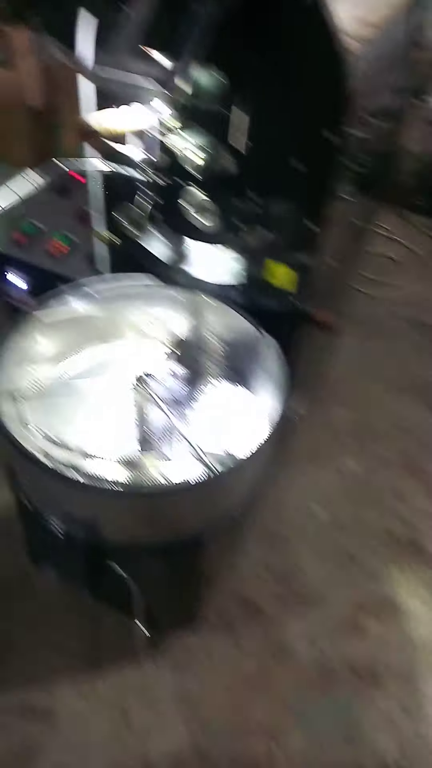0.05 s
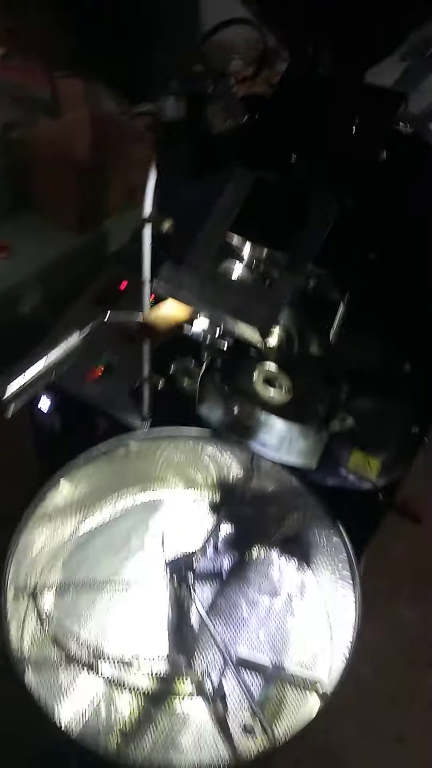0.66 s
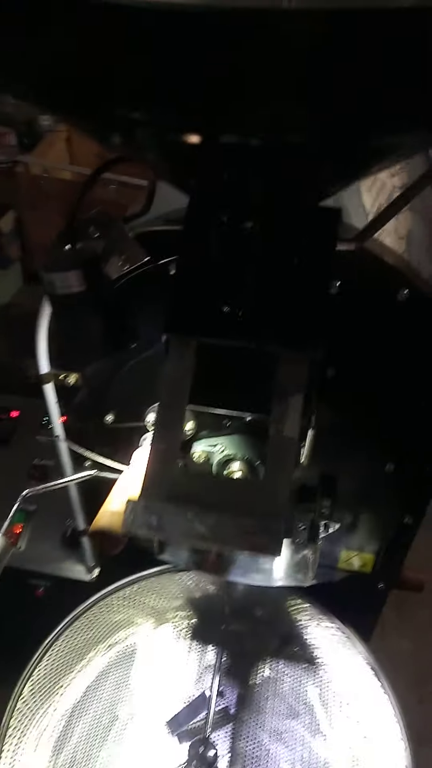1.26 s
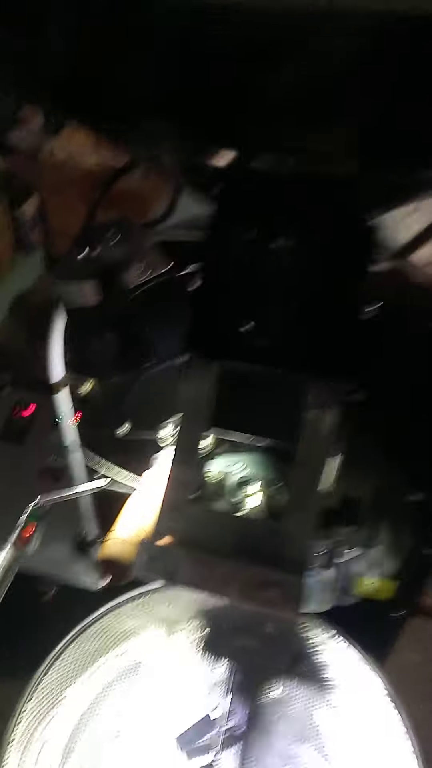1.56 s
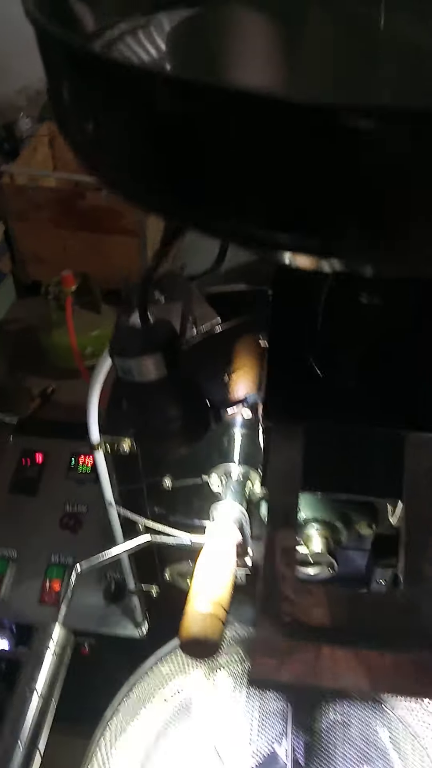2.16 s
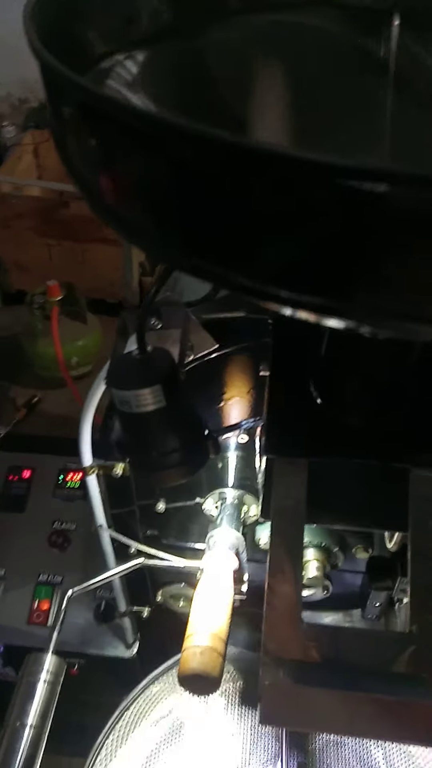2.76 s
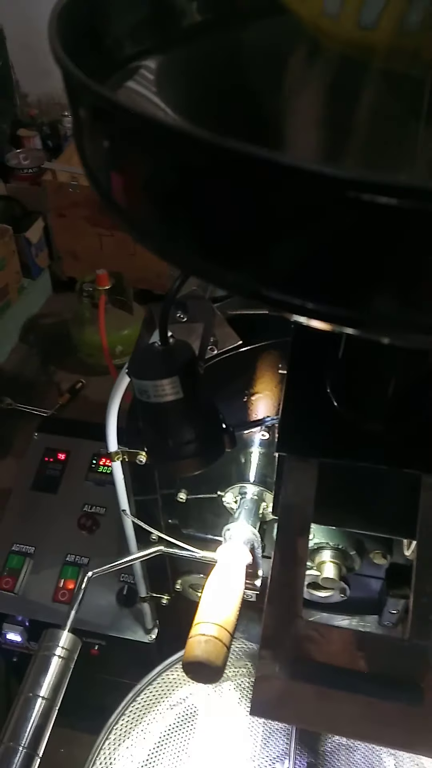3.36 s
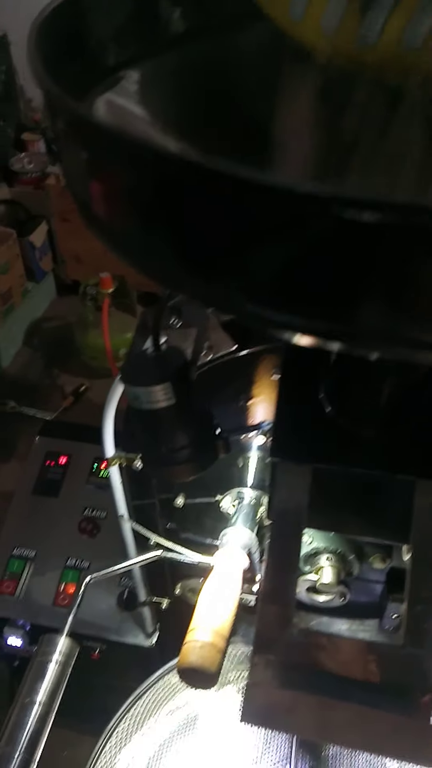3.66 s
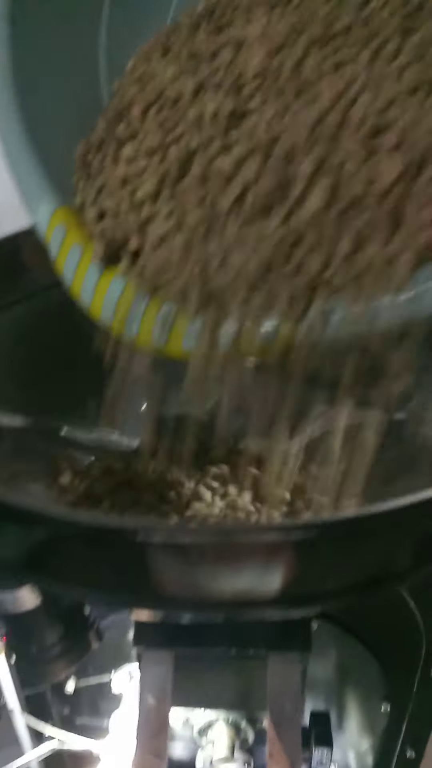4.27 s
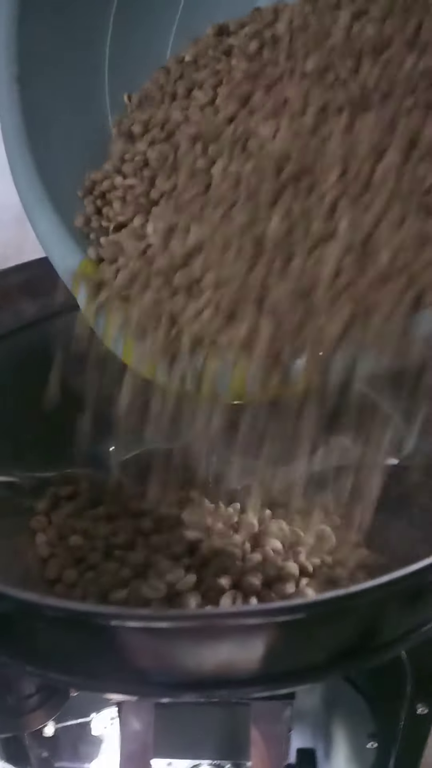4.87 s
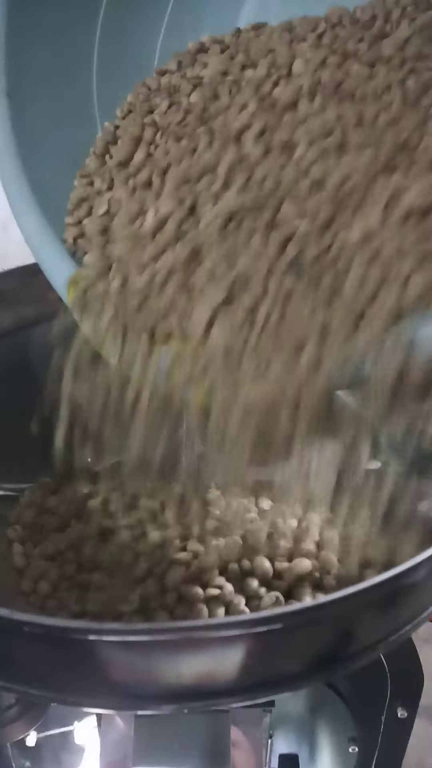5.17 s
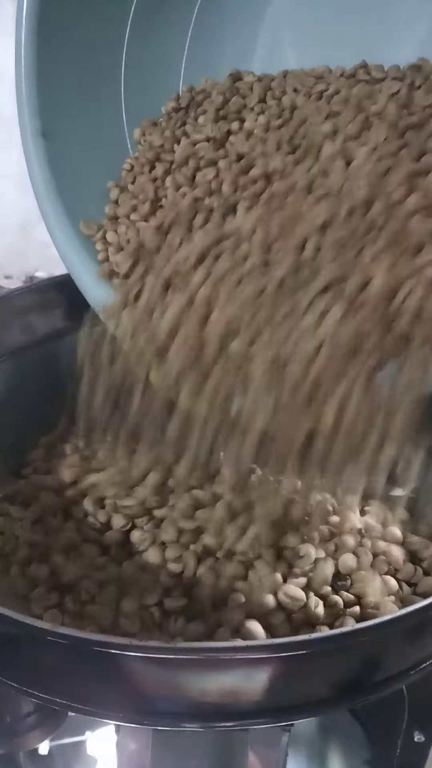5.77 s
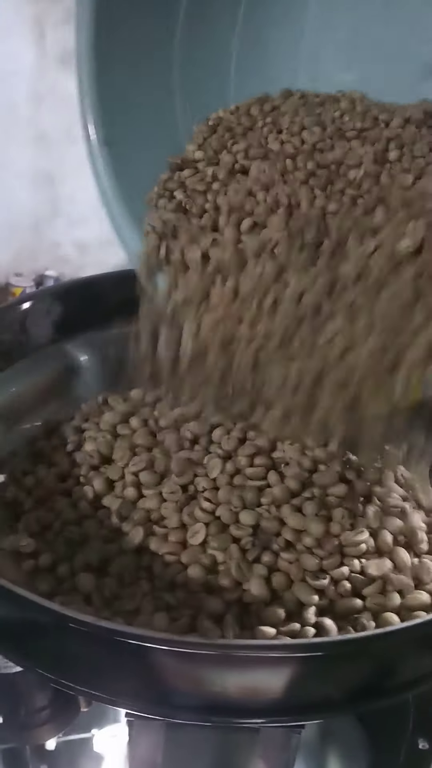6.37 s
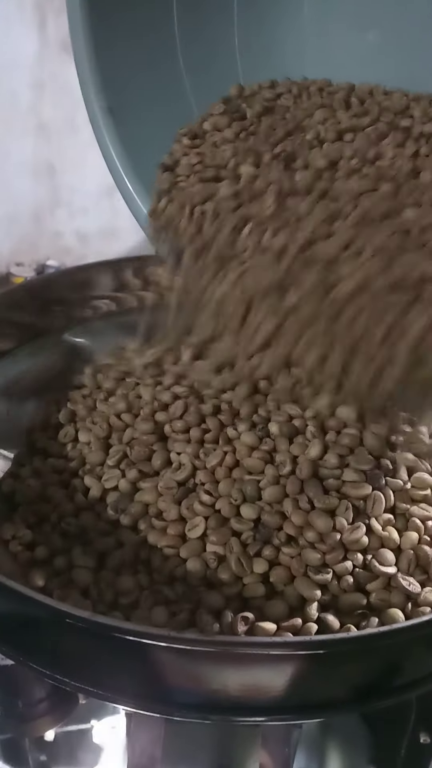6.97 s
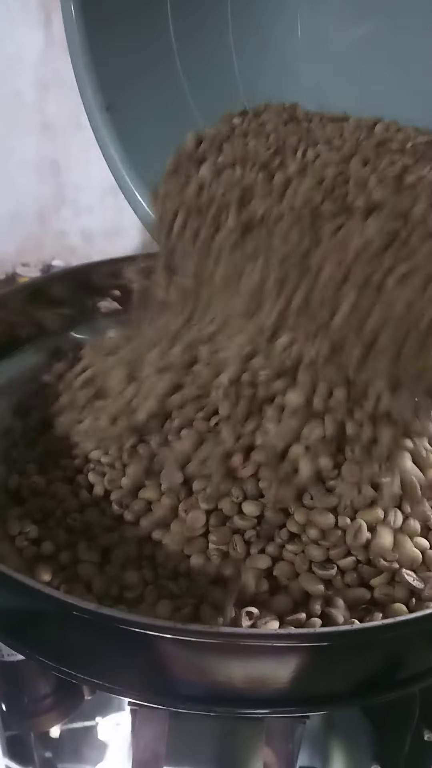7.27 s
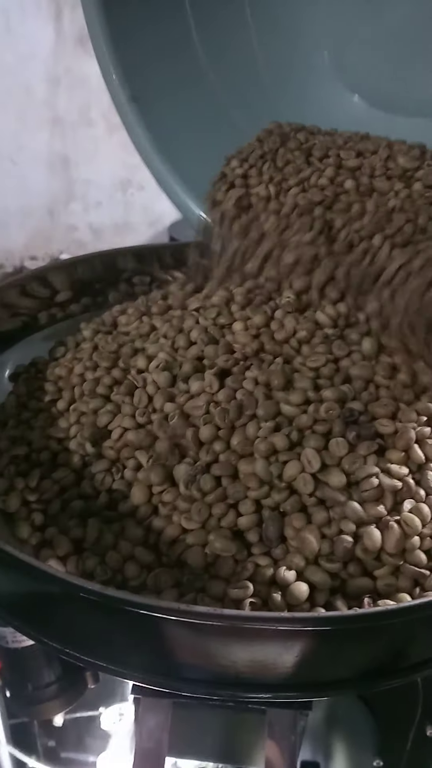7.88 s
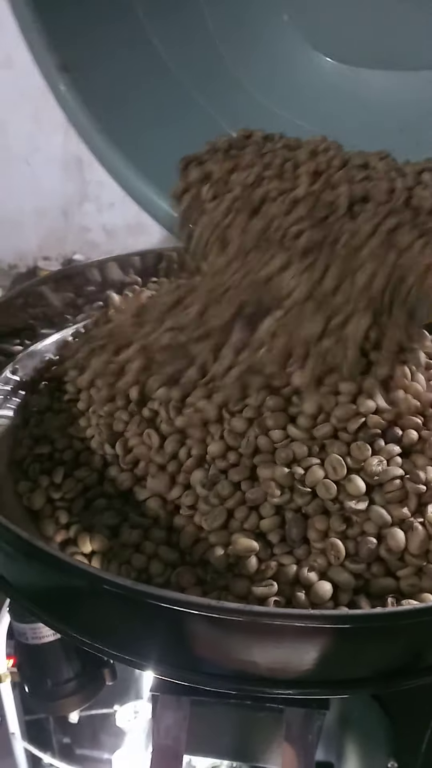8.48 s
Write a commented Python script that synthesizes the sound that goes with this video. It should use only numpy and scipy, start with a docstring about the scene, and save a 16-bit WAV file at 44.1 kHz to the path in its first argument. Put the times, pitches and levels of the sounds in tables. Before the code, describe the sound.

A coffee roaster's motor hums and its fan rushes throughout. Dry beans click and slide in a plastic basin, then pour into a steel pan with a dense, bright, ringing rattle and a few dull bumps. As the heap grows, the ringing dies away and single clinks stand out, leaving a softer rustle of beans landing on beans. The sound is close, with the faint echo of a small workshop.

```python
"""Coffee beans poured into a roaster

Dry beans crack and slide in a plastic basin, then hail into a steel pan, which rings.
A heap grows and covers the steel: the ring dies, single clinks stand out, and a softer rustle
of bean on bean is left. Now and then the heap spills against the wall. The roaster's motor and
fan run throughout; an automatic volume control turns everything down during the loudest rattle."""
import sys
import numpy as np
from scipy import signal
from scipy.fft import rfft, irfft
from scipy.io import wavfile
from scipy.ndimage import uniform_filter1d

SR = 44100
rng = np.random.default_rng(int(sys.argv[2]) if len(sys.argv) > 2 else 0)


def dump(signal):
    """Clip the signal to [-1, 1] and save it as 16-bit WAV at the path in sys.argv[1]."""
    limited = np.clip(np.atleast_2d(signal).T, -1, 1)
    pcm = np.round(limited * 32767).astype(np.int16)
    wavfile.write(sys.argv[1], SR, pcm)


N = 385434
T = np.arange(N) / SR

POUR_S, POUR_FULL_S, COVER_S = 2.864, 3.18, 3.86  # the pour starts, is full, starts to cover the steel
THIN_S, DEEP_S = 4.03, 5.47  # the heap is a thin layer, then deep enough to muffle the pan

# the first beans to land in the empty pan: (time [s], level [dB], time for the bounces to die [s])
FIRST_BEANS = [(2.697, -21, 1), (2.8186, -20, 0.56), (2.863, -19, 0.23)]
# short notes of the spots where beans strike the steel: (pitch [Hz])
STEEL_NOTES = [2870, 4380, 4820, 4850, 5350, 6420, 6560, 10100]
# clear notes of beans that strike squarely: (pitch [Hz])
SQUARE_HIT_NOTES = [4850, 4900, 4950, 5000, 4400, 5400, 5850, 6550]
# tone of a bean on steel: (frequency [Hz], level [dB])
STEEL_TONE = [(40, -59), (150, -23), (640, -43), (850, -15.5), (1400, -15), (1900, -9), (2900, -7.5),
              (3500, -3.5), (4300, -3), (5000, -2), (6500, 1.5), (8100, -8.5), (10000, -6), (12500, -15),
              (16000, -22.5)]
# the notes at which the whole pan rings: (pitch [Hz], level [dB])
PAN_RING = [(775, -55), (845, -49.5), (925, -54), (964, -49.5), (1045, -45), (1179, -46.5), (1300, -56),
            (1630, -50), (1700, -54), (1809, -50), (1897, -48), (1935, -47), (2067, -48), (2250, -52),
            (2338, -52), (2525, -49), (2649, -50), (2873, -45), (3041, -49), (3257, -51), (3410, -51),
            (4124, -47), (4323, -50), (4465, -46), (4813, -43.5), (4852, -45.5), (4990, -47), (5249, -47),
            (5475, -48), (5737, -47), (6465, -47), (6790, -50), (7250, -49), (7870, -53), (8801, -50)]

def pan(ring_db=23, muffle_db=-28, cover_db_per_s=20.5, thinning_s=0.14):
    """Beans hail on steel: a bright clatter, and a ring that lasts until the heap muffles it."""
    covered_s = np.maximum(T - COVER_S, 0)
    bare = np.exp(-covered_s / thinning_s)  # share of the steel still uncovered
    stream_db = np.interp(T, [POUR_S, POUR_FULL_S], [-20.5, -4])
    stream_db -= 0.5 * (1 - bare) + cover_db_per_s * covered_s
    clatter = shower(160 + 2500 * bare, STEEL_NOTES, spread_db=3.3, fade_s=0.045, snap=0.5, ping=0.2)
    pings = shower(70, SQUARE_HIT_NOTES, spread_db=5, fade_s=0.082, snap=0.6, ping=1.15)
    blows = (clatter + amp(-17) * pings) * amp(stream_db) * (T > POUR_S)
    bounces = shower(500, STEEL_NOTES, spread_db=5, fade_s=0.037, snap=0.89, ping=0.43)
    for s, db, fade_s in FIRST_BEANS:
        blows += bounces * (T > s) * amp(db - 15 - 60 * abs(T - s) / fade_s)
    rattle = amp(-1) * through(blows, tone_filter(STEEL_TONE, band=(4000, 7500)))
    for s, db, _ in FIRST_BEANS:
        add(rattle, s, amp(db) * hit(STEEL_TONE, fade_s=0.083, snap=0.66, ping=0.064, hz=4500))
    # higher notes die sooner; each swells and sinks as the stream finds other spots
    ring = sum(amp(db) * resonate(blows * amp(drift(12)), hz, width_hz=6 + 0.0034 * hz)
               for hz, db in PAN_RING)
    floor_note = resonate(blows, hz=2960, width_hz=84) * amp(-16.5) * bare
    return rattle + floor_note + ring * amp(ring_db + muffle_db * heap_depth(T))


# single clinks on steel and, later, crisp ticks of bean on bean: (time [s], level [dB], pitch [Hz])
CLINKS_AND_TICKS = [(4.2738, -14, 6520.0), (4.2961, -11, 6360.0), (4.3286, -8, 7210.0), (4.3601, -15, 6380),
                    (4.373, -13, 5390.0), (4.423, -13, 6440.0), (4.4567, -9.5, 6470.0),
                    (4.5087, -15, 6480.0), (4.5464, -14, 6920.0), (4.5908, -13.5, 4750.0),
                    (4.634, -15, 6470.0), (4.6503, -15, 6420.0), (4.6738, -17, 6400), (4.688, -11, 5320.0),
                    (4.6977, -13.5, 4870.0), (4.7135, -12.5, 4370.0), (4.7354, -13, 7310.0),
                    (4.7596, -11.5, 6880.0), (4.7735, -11.0, 5390.0), (4.7933, -10, 5360.0),
                    (4.819, -14.0, 4370.0), (4.8585, -12.5, 4860.0), (4.87, -20, 5510.0),
                    (4.8863, -12.0, 4820.0), (4.9121, -14.0, 5920.0), (4.925, -13, 6690.0),
                    (4.9383, -12, 5910.0), (4.9495, -12.0, 6440.0), (4.9917, -12.5, 5190.0),
                    (5.0318, -13.5, 4960.0), (5.0641, -13, 5420.0), (5.0946, -16, 6400.0),
                    (5.1312, -12.5, 6540.0), (5.1649, -17, 5060.0), (5.1789, -12, 5770.0),
                    (5.2092, -17, 4960.0), (5.2422, -12, 5870.0), (5.3192, -13.5, 6540.0),
                    (5.3487, -16, 5240.0), (5.3771, -19, 6360.0), (5.3898, -15, 6500.0),
                    (5.4163, -15, 6360.0), (5.4487, -16, 6600.0), (5.4732, -20, 6370.0),
                    (5.505, -16.5, 4860.0), (5.5183, -15.5, 4390.0), (5.5557, -20.5, 6660.0),
                    (5.8432, -20.5, 6370.0), (5.9129, -18.5, 6300.0), (5.996, -21, 5240.0),
                    (6.0585, -23.5, 6680.0), (6.2077, -24.5, 5190.0), (6.7207, -27, 4580.0),
                    (6.801, -31, 5370.0), (6.928, -27, 5000.0), (7.1266, -28.0, 6200.0),
                    (7.1797, -32, 5200), (7.271, -26, 5150.0), (7.3345, -28.5, 4760.0),
                    (7.3912, -29, 4920.0), (7.4635, -34, 5400), (7.6155, -27.5, 5220.0),
                    (7.798, -30.5, 4890.0), (7.9724, -24.5, 5240.0), (8.1219, -33.5, 4820.0),
                    (8.1468, -30.5, 6470.0), (8.295, -31, 6370.0), (8.3883, -32.5, 6400.0),
                    (8.4269, -28, 5170.0), (8.5422, -30, 5010.0), (8.6075, -24.5, 4940.0)]
# tone of one clink or tick: (frequency [Hz], level [dB])
CLINK_TONE = [(100, -63), (800, -20), (1900, -5.5), (3700, -6), (4500, 1), (6500, 2), (8100, -6),
              (10500, -4), (16000, -19)]

def clinks(low_hz=1328, low_peak_s=5.08, low_spread_s=0.42):
    """Single beans strike steel, later also other beans, and bounce once; a fuller pan sounds crisper."""
    out, t = np.zeros(N), np.arange(SR // 8) / SR
    low_note = np.sin(2 * np.pi * low_hz * t) * amp(-9 - 60 * t / 0.055)
    bounce_delays = rng.uniform(0.002, 0.007, len(CLINKS_AND_TICKS))
    for (s, db, hz), delay_s in zip(CLINKS_AND_TICKS, bounce_delays):
        fade_s = np.interp(s, [DEEP_S - 1, DEEP_S + 1], [0.055, 0.024])
        filled = heap_depth(s) ** 2
        add(out, s, amp(db) * hit(CLINK_TONE, fade_s, snap=0.4 * filled, ping=0.24, hz=hz))
        add(out, s + delay_s, amp(db - 4 - 12 * filled) * hit(CLINK_TONE, fade_s, snap=0, ping=0, hz=hz))
        # under a thin layer of beans, each hit also sounds a short low note of the pan
        add(out, s, amp(db) * low_note / (1 + ((s - low_peak_s) / low_spread_s) ** 2))
    return out


# how loudly beans land on the heap: (time [s], level [dB])
HEAP_FLOW = [(3.6, -26.5), (4.3, -31), (5.2, -30), (6.4, -36.5), (7.76, -40), (7.88, -44.5), (8.74, -42)]
# short notes of one bean striking another: (pitch [Hz])
HEAP_NOTES = [1900, 2300, 3000, 4700, 5200, 6400, 9500, 11000]
# tone of bean on bean: (frequency [Hz], level [dB])
HEAP_TONE = [(40, -35), (130, -11.5), (300, 0), (430, 1.5), (640, -6.5), (820, 4.5), (1150, 1), (2100, 3.5),
             (3000, 3), (3750, -1.5), (4800, 1.5), (6500, 1), (8000, -7), (10200, -1.5), (12800, -8),
             (16000, -10)]

def heap(bass_hz=700, treble_hz=4500, dulling_db_per_s=1.34):
    """Beans land on beans: a rustle of soft clicks, with a crisp tick when one lands squarely."""
    clicks = shower(3000, HEAP_NOTES, spread_db=2.9, fade_s=0.0098, snap=0.84, ping=0.17)
    clicks *= avalanches(per_s=60, fade_s=0.05, swell=0.6)
    soft = through(clicks, tone_filter(HEAP_TONE, band=(1000, 3500)))
    ticks = shower(70, HEAP_NOTES, spread_db=4.5, fade_s=0.014, snap=2, ping=0.3)
    crisp = tone_filter([(500, -33), (3000, 6.5), (5500, 13.5), (8000, 2), (10000, 2), (16000, -10)])
    rustle = soft + amp(-4.5) * through(ticks, crisp)
    bass, below_treble = keep_below(rustle, bass_hz), keep_below(rustle, treble_hz)
    middle, treble = below_treble - bass, rustle - below_treble
    bass_db = -11 + 12 * heap_depth(T) ** 2  # a deeper heap sounds fuller
    treble_db = 5 - dulling_db_per_s * np.maximum(T - THIN_S, 0)  # a shorter fall sounds duller
    return volume_curve(HEAP_FLOW, fade_s=0.25) * (bass * amp(bass_db) + middle + treble * amp(treble_db))


def heap_depth(s):
    """Depth of the heap at time s, from 0 (a thin layer at most) to 1 (deep)."""
    return np.clip((s - THIN_S) / (DEEP_S - THIN_S), 0, 1)


# slumps of the heap: (time [s], length [s], level [dB], growth [dB/s], hits [1/s])
HEAP_SPILLS = [(4.83, 0.75, -22, -6.5, 410), (7.2, 1, -37.5, -18, 150), (8.42, 0.297, -47, 55, 930)]
# short notes of the wall under a spill: (pitch [Hz])
PATTER_NOTES = [4750, 4950, 5050, 5250, 6550]

def spills():
    """Beans roll off the heap and patter on the wall, which answers with short bright notes."""
    gain, per_s = bean_runs(HEAP_SPILLS, rise_s=0.022, stop_s=0.071)
    patter = shower(per_s, PATTER_NOTES, spread_db=4.5, fade_s=0.032, snap=1, ping=0.29)
    return gain * unit(through(patter, tone_filter(CLINK_TONE)))


# stretches of beans sliding in the basin; the last two form one slide that swells, then ebbs:
# (time [s], length [s], level [dB], growth [dB/s], hits [1/s])
BASIN_SLIDES = [(0.82, 0.49, -55, 22, 550), (1.45, 0.4, -43.5, 2, 1440), (2.065, 0.11, -38, 10, 1500),
                (2.16, 0.63, -35.5, -3.5, 2250)]
# short notes of the struck plastic: (pitch [Hz])
PLASTIC_NOTES = [1300, 2000, 2650, 2850, 3000, 3150, 4900, 6300]
# tone of beans sliding on plastic: (frequency [Hz], level [dB])
SLIDE_TONE = [(100, -50), (450, -5.5), (700, -19.5), (1200, -7.5), (2000, -2), (2850, -3.5), (3900, -4),
              (5200, -7.5), (6600, -5.5), (8000, -17), (10200, -13.5), (12500, -21), (16000, -27)]
# single beans cracking against the plastic: (time [s], level [dB], added brightness [dB/octave])
BASIN_CRACKS = [(0.8266, -32.5, -10), (0.864, -30.5, -7), (0.9276, -31, -0.5), (1.0054, -35.0, -5),
                (1.0385, -33, 3), (1.045, -27, -11), (1.119, -36.5, -6.0), (1.1402, -33, -5),
                (1.1433, -34.5, -2.0), (1.1781, -40, -3), (1.1893, -35.5, 1), (1.203, -33.5, -11),
                (1.226, -35, -1.0), (1.27, -35, -5.0), (1.2899, -38, 1), (1.3005, -29.5, -3),
                (1.3085, -35, 0.0), (1.3328, -30.5, -6), (1.3678, -36, -2), (1.3766, -35, -9),
                (1.435, -30.5, -1), (1.4585, -34.5, -2.0), (1.4726, -30.5, -7), (1.4984, -36, -2),
                (1.5128, -30.0, 0.0), (1.5169, -31.5, 1), (1.5467, -28, 0), (1.5662, -30, 3.0),
                (1.583, -26, 0.0), (1.638, -31, 0.0), (1.6424, -35, 2), (1.6682, -29, 2), (1.7451, -31, 0),
                (1.7618, -32.5, 0.0), (1.7945, -27, 1.5), (1.8093, -29, 2), (1.83, -29.5, 1),
                (1.858, -35, -3.0), (1.8637, -30.5, -10), (2.062, -30, -2), (2.0764, -29.5, -2),
                (2.2808, -26.5, 0)]
# tone of one such crack: (frequency [Hz], level [dB])
CRACK_TONE = [(100, -77), (800, -15), (1400, -2.5), (2850, -3), (4000, -2), (6600, 0), (8000, -12),
              (10200, -9), (16000, -28)]

def basin(hollow_hz=2820, hollow_peak_s=1.58, hollow_spread_s=0.39):
    """Beans crack and slide on dull plastic; the basin sounds hollow while loose beans tumble in it."""
    gain, per_s = bean_runs(BASIN_SLIDES, rise_s=0.03, stop_s=0.27)
    clicks = shower(per_s, PLASTIC_NOTES, spread_db=3.8, fade_s=0.014, snap=2.4, ping=0.2)
    clicks *= avalanches(per_s=50, fade_s=0.06, swell=1.5)
    out = gain * through(clicks, tone_filter(SLIDE_TONE, band=(1200, 4000)))
    for s, db, brightness in BASIN_CRACKS:
        tone = [(hz, tone_db + brightness * np.log2(max(hz / hollow_hz, 1))) for hz, tone_db in CRACK_TONE]
        add(out, s, amp(db) * hit(tone, fade_s=0.018, snap=2.8, ping=0.1, hz=hollow_hz))
    hollow = resonate(out, hollow_hz, width_hz=580) * amp(-13.5)
    return out + hollow / (1 + ((T - hollow_peak_s) / hollow_spread_s) ** 4)


# bumps of the basin against the pan: (time [s], peak level [dB])
BASIN_BUMPS = [(3.162, -24), (3.261, -25), (3.469, -21), (3.76, -20)]

def thuds(fade_s=0.22):
    """The basin nudges the pan: each bump is a short burst of low, dull noise."""
    out, t = np.zeros(N), np.arange(SR // 3) / SR
    dull = tone_filter([(20, -18), (60, -5), (150, 1), (450, 0), (750, -8), (2000, -48)])
    for s, db in BASIN_BUMPS:
        thud = through(rng.standard_normal(len(t)) * amp(-60 * t / fade_s), dull)
        add(out, s, amp(db) * thud / abs(thud).max())
    return out


# the notes in the motor's hum: (multiple of the motor's pitch, level [dB])
MOTOR_NOTES = [(.5, -17), (1, 8), (1.5, -9), (2, -4.5), (2.46, -6)]
# tone of the rush of drum and fan: (frequency [Hz], level [dB])
RUSH_TONE = [(100, -49.5), (175, -14.5), (245, 3.5), (330, -5.5), (420, -9.5), (700, -11), (860, -8),
             (1200, -10), (1800, -16.5), (4900, -14.5), (6800, -22), (8050, -32), (10000, -24),
             (14000, -45)]
# whistles in that rush: (pitch [Hz], width [Hz], level against the rush [dB])
RUSH_WHISTLES = [(863, 34, -14), (10100, 200, -29)]
# thin whine of the motor drive: (pitch [Hz], level against the rush [dB])
DRIVE_WHINE = [(4883, -19), (5572, -26), (9566, -35), (9927, -26), (10094, -22), (10449, -40)]

def roaster(motor_hz=99.95, drum_turns_per_s=1.34, hum_db=-49.5, rush_db=-45.5):
    """The motor's hum swells once in each turn of the drum, while the fan rushes and the drive whines."""
    hum = sum(amp(db + drift(5.7)) * np.sin(2 * np.pi * k * motor_hz * T + 0.14 * k * drift(2.8))
              for k, db in MOTOR_NOTES)
    rush = unit(through(rng.standard_normal(N), tone_filter(RUSH_TONE))) * amp(drift(7.7))
    whistle = sum(amp(db) * resonate(rng.standard_normal(N), hz, width) for hz, width, db in RUSH_WHISTLES)
    whine = sum(amp(db + 4.5 * drift(14)) * np.sin(2 * np.pi * hz * T + 1.1 * drift(14))
                for hz, db in DRIVE_WHINE)
    deep = tone_filter([(20, -41), (50, -1.5), (130, 15), (220, 3.5), (600, -29), (3000, -78)])
    rumble = amp(-10) * unit(through(rng.standard_normal(N), deep))
    swell_db = 5 * np.cos(np.pi * drum_turns_per_s * (T - 0.79)) ** 4
    motor = amp(hum_db + swell_db) * unit(hum)
    return motor + amp(rush_db) * (rush + whistle + np.sqrt(2) * whine + rumble)


def room(x, fade_s=0.24, echo_db=-13):
    """The walls of a small workshop add a short, faint echo."""
    t = np.arange(SR // 2) / SR
    tail = rng.standard_normal(len(t)) * amp(-60 * t / fade_s) * (t > 0.005)
    return x + amp(echo_db) * through(x, tail / np.linalg.norm(tail))


def contact(fade_s, snap, ping, hz, size=2048):
    """One bean's blow: a sharp snap, then noise and a note (the ping) that drop 60 dB in fade_s."""
    t = np.arange(size) / SR
    fade = amp(-60 * t / fade_s)
    noise = rng.standard_normal(size) * (fade + snap * np.exp(-t / 0.0003))
    note = np.sin(2 * np.pi * hz * t) * fade
    blow = unit(noise) + ping * unit(note)
    return blow / np.linalg.norm(blow)


def hit(tone, fade_s, snap, ping, hz):
    """One blow with the tone of the struck surface, scaled to strength 1 over its first 3 ms."""
    blow = through(contact(fade_s, snap, ping, hz), tone_filter(tone))
    return blow / np.sqrt(np.mean(blow[:round(0.003 * SR)] ** 2))


def shower(per_s, notes, spread_db, fade_s, snap, ping, count=32):
    """About per_s random blows a second, uneven in strength, each near one of the notes."""
    strength = amp(spread_db * np.minimum(rng.exponential(1, N), 2.7)) * (rng.random(N) < per_s / SR)
    # keep the overall loudness steady, however many beans fall
    strength /= np.sqrt(abs(uniform_filter1d(strength ** 2, size=2600)) + 0.5 * per_s / SR)
    pitches = np.resize(notes, count) * rng.uniform(0.94, 1.02, count)
    blows = [contact(fade_s, snap, ping, hz) for hz in pitches]
    spot = rng.integers(0, count, N)
    out = np.zeros(N + SR)
    for at in np.flatnonzero(strength):
        blow = blows[spot[at]]
        out[at:at + len(blow)] += strength[at] * blow
    return out[:N]


def avalanches(per_s, fade_s, swell):
    """Volume curve of beans moving in clumps: each starts at once and trickles out."""
    starts = rng.exponential(1, N) * (rng.random(N) < per_s / SR)
    power = signal.lfilter([1], [1, -amp(-60 / (fade_s * SR)) ** 2], starts)
    return unit(np.sqrt(1 + swell * power))


def bean_runs(rows, rise_s, stop_s):
    """Joint volume and hits per second of runs of beans that start fast, grow or ebb, then trickle out."""
    gains = []
    for s, length, db, growth_db, _ in rows:
        running_s, after_s = np.clip(T - s, 0, length), np.maximum(T - s - length, 0)
        rise = np.minimum(running_s / rise_s, 1)
        gains.append(rise * amp(db + growth_db * running_s) * np.exp(-after_s / stop_s))
    power = np.array(gains) ** 2 + 1e-20
    hits_per_s = np.array(rows)[:, -1]
    return np.sqrt(power.sum(0)), hits_per_s @ power / power.sum(0)


def resonate(x, hz, width_hz):
    """Lets x ring at one pitch; the narrower the width, the longer it rings."""
    r = np.exp(-np.pi * width_hz / SR)
    feedback = [1, -2 * r * np.cos(2 * np.pi * hz / SR), r * r]
    return np.sqrt((1 - r * r) / 2) * signal.lfilter([1, 0, -1], feedback, x)


def tone_filter(points, band=(0, SR), size=2048):
    """A filter from (frequency [Hz], level [dB]) points; noise of strength 1 gives 1 inside the band."""
    hz = abs(np.fft.fftfreq(size, 1 / SR))
    point_hz, db = np.transpose(points)
    gain = amp(np.interp(np.log(hz + 1), np.log(point_hz), db))
    gain /= np.sqrt(np.mean(gain ** 2 * (hz >= band[0]) * (hz <= band[1])))
    spectrum = np.exp(np.conj(signal.hilbert(np.log(gain))))  # so that nothing sounds before the blow
    return np.fft.ifft(spectrum).real[:size // 2]


def through(x, response):
    """Plays x through a filter or an echo."""
    return signal.oaconvolve(x, response)[:len(x)]


def keep_below(x, edge_hz):
    """Keeps the part of x that is lower in pitch than the edge."""
    return irfft(rfft(x) / (1 + (np.fft.rfftfreq(N, 1 / SR) / edge_hz) ** 4), N)


def drift(per_s):
    """A smooth random wobble of strength 1, with up to about per_s swings a second."""
    coarse = T[::128]
    hz = np.fft.rfftfreq(len(coarse), coarse[1])
    slow = irfft(rfft(rng.standard_normal(len(coarse))) * np.exp(-(hz / per_s) ** 2), len(coarse))
    return np.interp(T, coarse, unit(slow))


def volume_curve(rows, fade_s):
    """Joins (time [s], level [dB]) points and fades to silence at both ends."""
    s, db = np.transpose(rows)
    fade = np.interp(T, [s[0] - fade_s, s[0], s[-1], s[-1] + fade_s], [0, 1, 1, 0])
    return amp(np.interp(T, s, db)) * fade


def add(mix, s, sound):
    """Mixes a sound in at time s."""
    part = mix[round(s * SR):][:len(sound)]
    part += sound[:len(part)]


def amp(db):
    """Turns decibels into a volume factor."""
    return 10 ** (np.asarray(db) / 20)


def unit(x):
    """Scales x to an average strength (rms) of 1."""
    return x / np.sqrt(np.mean(x ** 2) + 1e-20)


def scene():
    """The beans in the room, over the running roaster, which grows louder as we walk up to it."""
    beans = room(basin() + pan() + spills() + clinks() + heap() + thuds())
    approach = amp(np.interp(T, [0, 1.7], [-2.5, 0]))
    return (beans + roaster() * approach)[None]


def record(dry, threshold_db=-30, ratio=2.93, follow_s=0.048, recover_db_per_s=23, top_hz=15900):
    """A volume control turns loud moments down and recovers slowly; then the highest treble is cut."""
    keep = np.exp(-1 / (follow_s * SR))
    level_db = 10 * np.log10(signal.lfilter([1 - keep], [1, -keep], dry[0] ** 2) + 1e-12)
    cut_db = np.maximum(level_db - threshold_db, 0) * (1 - 1 / ratio)
    held_db = np.maximum.accumulate(cut_db + recover_db_per_s * T) - recover_db_per_s * T
    treble_cut = signal.firwin(511, top_hz, window=("kaiser", 9), fs=SR)
    return signal.oaconvolve(dry * amp(-held_db), treble_cut[None], "same")


dry = scene()
out = record(dry)
dump(out)
```